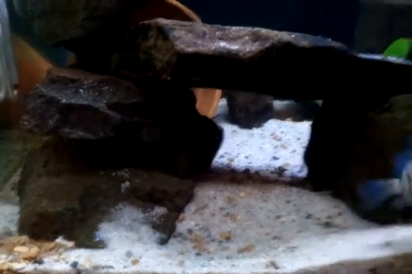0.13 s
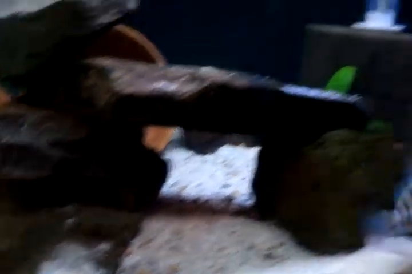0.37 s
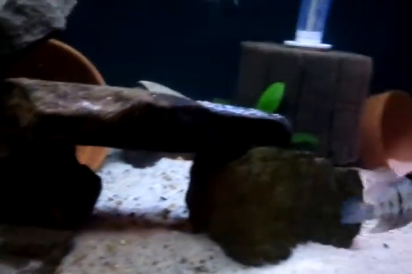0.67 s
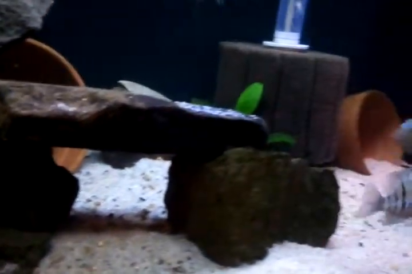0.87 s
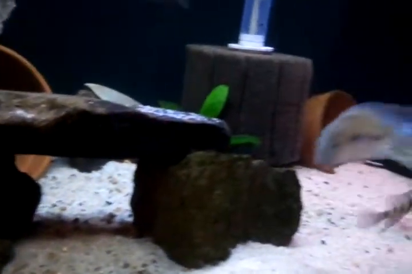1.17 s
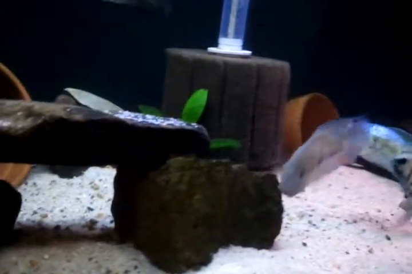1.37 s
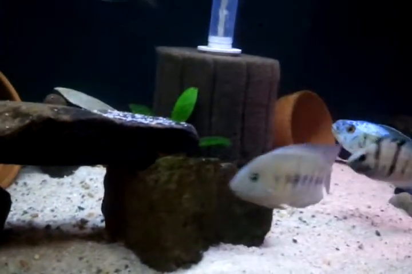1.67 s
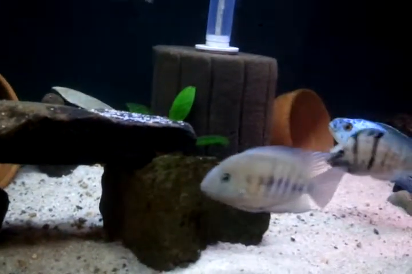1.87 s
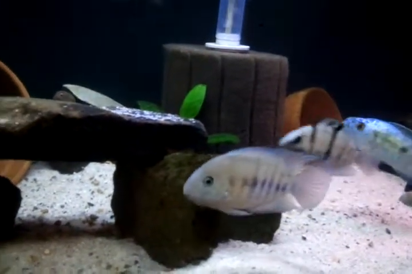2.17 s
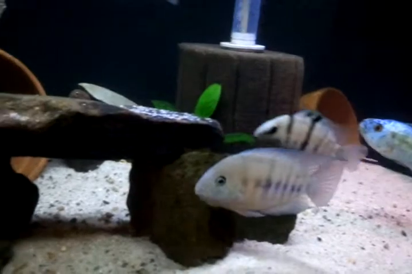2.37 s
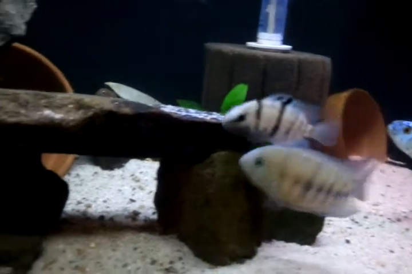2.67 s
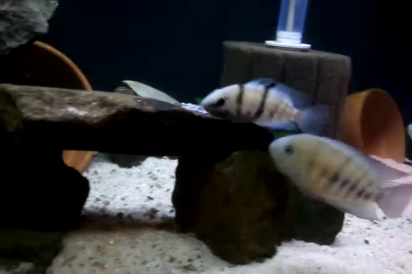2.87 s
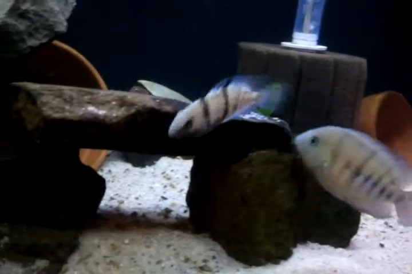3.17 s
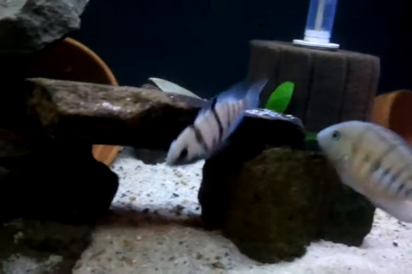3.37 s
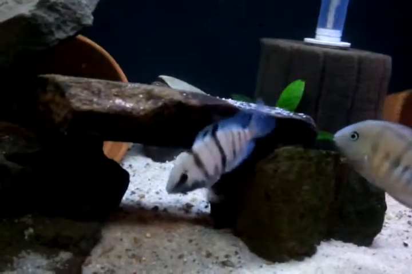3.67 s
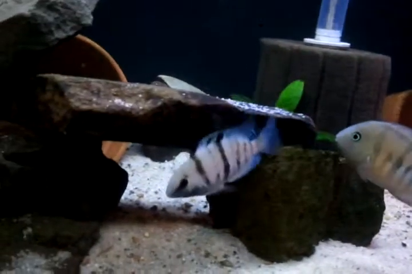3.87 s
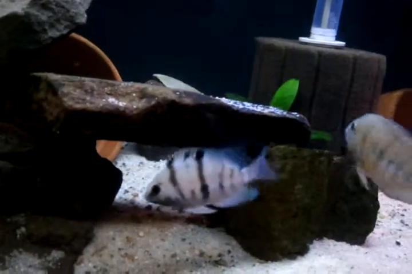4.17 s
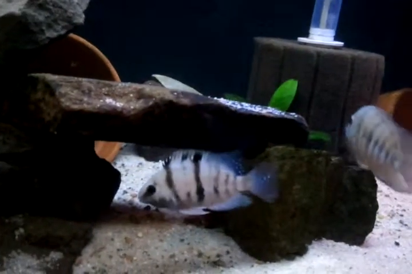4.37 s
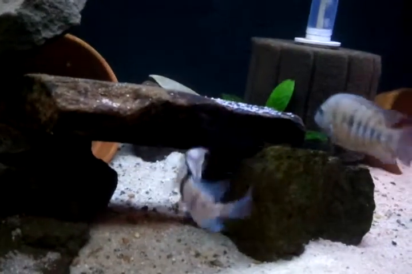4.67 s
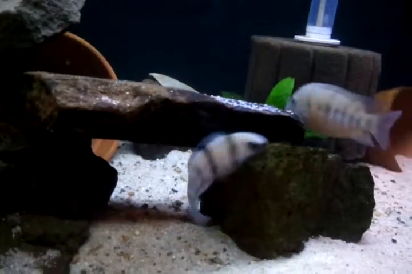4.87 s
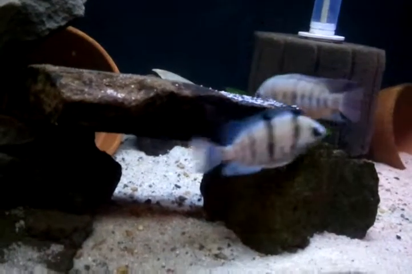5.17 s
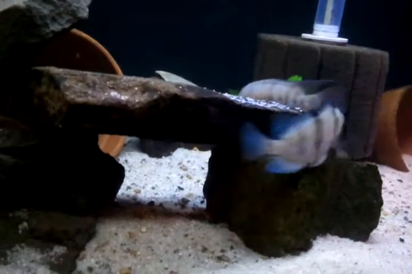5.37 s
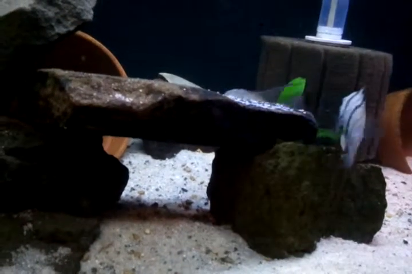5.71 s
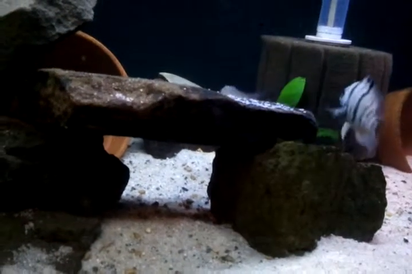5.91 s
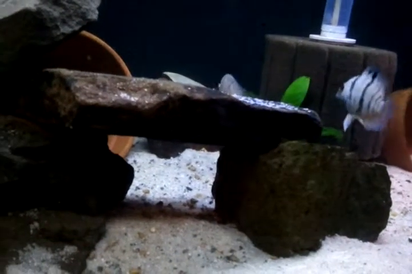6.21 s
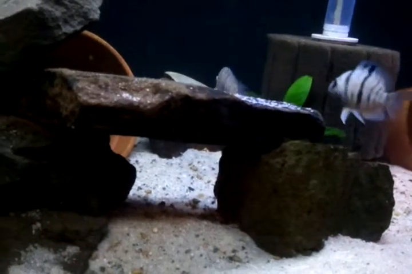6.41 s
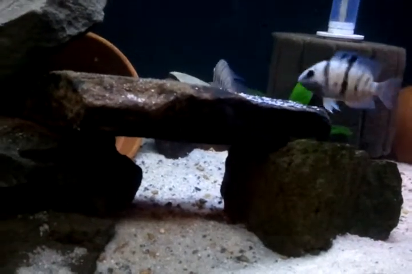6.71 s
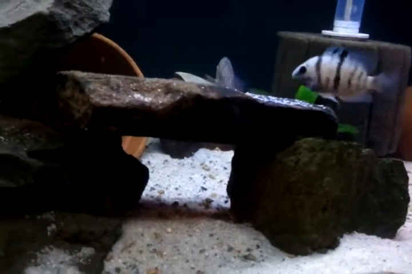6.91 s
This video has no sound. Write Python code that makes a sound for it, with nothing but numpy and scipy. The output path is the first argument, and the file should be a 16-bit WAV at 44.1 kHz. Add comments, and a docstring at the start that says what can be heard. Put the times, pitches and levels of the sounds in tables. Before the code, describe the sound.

An aquarium filter trickles and bubbles over a humming, whining pump, with dull bumps on the tank early on.

```python
"""A small room with an aquarium, heard in mono from one microphone within earshot of the tank.
The filter trickles into the water: a wash of tiny bubbles, with splashes and single plinks on top.
Behind it the mains-driven pump hums and whines. In the first second or so, dull bumps shake the tank
and its stand; a few faint ones follow. The microphone's input sits off centre, so its limiter ducks
on the downward swings of the bumps."""
import sys
import numpy as np
from scipy import signal
from scipy.fft import rfft, irfft, next_fast_len
from scipy.io import wavfile
from scipy.ndimage import uniform_filter1d, minimum_filter1d, map_coordinates

SR = 44100
rng = np.random.default_rng(int(sys.argv[2]) if len(sys.argv) > 2 else 0)


def master(y):
    """Save y as 16-bit WAV."""
    cut = np.clip(np.atleast_2d(y).T, -1, 1)
    pcm = np.round(cut * 32767)  # scale
    wavfile.write(sys.argv[1], SR, pcm.astype(np.int16))


N = 310905

# Low room tone. Each row: frequency in Hz, relative level in dB.
ROOM_SPECTRUM = [(15, -17.5), (28, -3.5), (70, -4), (110, -10), (150, -14.5), (220, -12), (300, -15.5),
                 (430, -21), (800, -19.5), (2000, -50)]
# Reverberation off the walls. Each row: frequency in Hz, seconds to fall 60 dB.
WALL_DECAY = [(200, 0.15), (1200, .18), (7000, .16)]
# How near the pump sounds. Each row: time in seconds, gain in dB.
PUMP_NEARNESS = [(0, -0.5), (2.7, 1.1), (4.2, 1), (4.9, 1), (6.1, -2), (7.05, 0)]
# The pump's hum. Each row: multiple of the mains frequency, level in dB.
PUMP_HARMONICS = [(1, -40.5), (2, -40), (3, -45), (4, -44.5), (5, -61.5), (6, -47.5), (9, -52), (10, -52),
                  (12, -60.5), (17, -63.5), (22, -52.5), (23, -39.5), (24, -48.5), (25, -55.5)]
# Resonances shaken by pump and flow. Each row: centre in Hz, half-width in Hz, level in dB.
PUMP_RESONANCES = [(28, 9.1, -37.5), (57, 23, -45.5), (89, 18, -48.5), (325.5, 17, -50.5), (566, 10, -51),
                   (1705, 5.7, -63)]
# Blows on the tank. Each row: start in seconds, level in dB, pitch in Hz, knock against body in dB.
BUMP_EVENTS = [(.32, -23, 154, -4.5), (.468, -5.5, 267, -17.5), (0.479, -7.5, 123, -18),
               (.512, -9.5, 175, -16.5), (.545, -15, 64.7, -22.5), (0.646, -12, 191, -25),
               (.664, -5.5, 201, -20.5), (.70, -8, 180, -26.5), (.729, -20, 253, -10.5),
               (0.931, -14.5, 65, -20), (1.085, -6, 33.3, -36), (1.105, -2, 138.7, -16.5),
               (1.131, -13.5, 233, -26.5), (1.149, -9, 107, -29.5), (1.907, -25.5, 251, 0),
               (2.08, -21, 178, -12.5), (2.221, -30.5, 220, -20)]
# Modes of tank and stand. Each row: frequency in Hz, relative level in dB, seconds to fall 60 dB.
TANK_MODES = [(32, 2, 0.43), (71.5, 2, 0.49), (102, 1, 0.29), (123.5, 2, .28), (154.7, -5, 0.45),
              (182.5, 0.5, 0.38), (207.4, 1, 0.22), (226.3, 1.5, 0.18), (257.5, -8, 0.41),
              (335, -18.5, 0.35), (405.3, 0.5, 0.42), (453, -14, 0.42), (698, 6, 0.34)]
# The hard part of a blow. Each row: frequency in Hz, relative level in dB.
KNOCK_SPECTRUM = [(200, -5), (410, 0.5), (500, -8.5), (800, -8), (1400, -13), (2500, -34.5), (6000, -49)]
# The ring after the middle bumps. Each row: centre in Hz, half-width in Hz, level in dB.
LINGER_RESONANCES = [(280, 19, -35.5), (437, 45, -41.5)]
# Splashes of the stream. Each row: start in seconds, bubble pitch in Hz, level in dB.
SPATTER_EVENTS = [(.198, 3400, -28.5), (0.899, 3500, -28), (1.733, 3130, -27), (1.892, 3830, -24),
                  (2.142, 3000, -26), (2.202, 4250, -27), (3.073, 5900, -30), (3.356, 3200, -26),
                  (3.63, 3870, -31), (3.857, 3480, -24.5), (4.102, 2950, -22), (4.195, 3550, -21.5),
                  (4.283, 3000, -29.5), (4.345, 3010, -27), (4.705, 3270, -28.5), (5.142, 3680, -28),
                  (6.82, 4740, -27.5), (6.929, 3330, -29.5)]
# Single big bubbles. Each row: start in seconds, pitch in Hz, level in dB.
PLINK_EVENTS = [(1.402, 1680, -27), (1.413, 1300, -27.5), (1.437, 1300, -23), (1.583, 2160, -23),
                (2.078, 775, -37), (2.205, 1106, -27.5), (2.218, 1110, -28.5), (2.659, 1276, -26),
                (2.683, 1275, -27.5), (2.731, 2140, -26), (2.88, 786, -32), (2.985, 1290, -28),
                (3.074, 2150, -30), (3.392, 1340, -28), (3.62, 857, -37), (3.762, 768, -34),
                (3.892, 1700, -29), (4.118, 1710, -27.5), (4.187, 1020, -33.5), (5.185, 1117, -31),
                (5.476, 1135, -31), (5.656, 1535, -31.5), (5.789, 1030, -29), (5.969, 1670, -32),
                (6.226, 1018, -34)]
# Tone of the trickle at the microphone. Each row: frequency in Hz, relative level in dB.
WATER_SPECTRUM = [(350, -8), (600, -9.5), (900, -7.5), (1200, -7), (1700, -2), (2100, -4.5), (2450, -3.5),
                  (3200, 1), (4200, 1.5), (5300, -3), (6500, -4.5), (7100, -19)]
# Strength of the filter's outflow. Each row: time in seconds, level in dB.
OUTFLOW = [(.03, -44.5), (.25, -42), (.95, -38), (1.15, -40), (1.5, -38), (2.4, -39.5), (3.0, -39.5),
           (3.5, -38.5), (4.5, -40), (5.0, -39.5), (5.6, -42), (6.3, -43.5), (6.7, -43), (6.92, -35.5),
           (7.05, -43.5)]

MAINS_HZ = 60.01
TIME = np.arange(N) / SR


def amp(db):
    """Decibels to gain."""
    return 10 ** (np.asarray(db) / 20)


def unit(x):
    """Scale to rms 1."""
    return x / np.sqrt(np.mean(x ** 2) + 1e-20)


def along(points, hz):
    """Read (Hz, value) points on a log frequency axis."""
    freqs, values = np.transpose(points)
    return np.interp(np.log(hz + 1), np.log(freqs + 1), values)


def curve(points):
    """Read (seconds, value) points at every sample."""
    return np.interp(TIME, *np.transpose(points))


def wobble(rate):
    """A smooth random curve, rate knots a second."""
    knots = rng.standard_normal(int(N * rate / SR) + 4)
    return map_coordinates(knots, [np.arange(N) * rate / SR])


def filtered(x, response):
    """Shape x with a gain that depends on frequency."""
    size = next_fast_len(len(x) + 8192)
    return irfft(rfft(x, size) * response(np.fft.rfftfreq(size, 1 / SR)), size)[:len(x)]


def noise(response):
    """Coloured noise of rms 1."""
    return unit(filtered(rng.standard_normal(N), response))


def burst(t, response, t60):
    """Coloured noise that falls 60 dB in t60 seconds."""
    return filtered(rng.standard_normal(len(t)), response) * amp(-60 * t / t60)


def add(track, start, sound):
    """Mix a sound into the track, start seconds in."""
    part = track[max(round(start * SR), 0):][:len(sound)]
    part += sound[:len(part)]


def resonances(table):
    """Narrow resonances shaken at random."""
    return sum(amp(db) * noise(lambda hz: 1 / (1 + ((hz - centre) / width) ** 2))
               for centre, width, db in table)


def room(x, wet_db):
    """Direct sound plus the walls' answer; the tail changes as bubbles burst at different spots."""
    out, block = x.copy(), SR // 3
    for start in range(0, N, block):
        hz, t, spectrum = signal.stft(rng.standard_normal(block), SR, nperseg=256)
        decay = amp(-60 * t / along(WALL_DECAY, hz)[:, None])
        tail = signal.istft(spectrum * decay, SR, nperseg=256)[1]
        reverb = signal.fftconvolve(x[start:start + block], tail / np.linalg.norm(tail))
        add(out, start / SR, amp(wet_db) * reverb)
    return out


def room_tone(sag_db_per_s=0.55):
    """The room's low rumble eases slowly and grows a little near the pump."""
    level_db = -35 - sag_db_per_s * TIME + 0.62 * curve(PUMP_NEARNESS) + 0.52 * wobble(4.4)
    return amp(level_db) * noise(lambda hz: amp(along(ROOM_SPECTRUM, hz)))


def pump():
    """Mains harmonics, slightly unsteady under load; the housing favours a few of them as a whine."""
    mains_phase = 2 * np.pi * MAINS_HZ * TIME
    hum = np.zeros(N)
    for k, db in PUMP_HARMONICS:
        lag = np.pi * k ** 2 / 2 + 5 / k  # the housing disperses the harmonics, smoothing the whine
        hum += amp(db + 0.95 * wobble(2.86)) * np.sin(k * mains_phase - lag + 0.034 * wobble(9.7))
    return amp(curve(PUMP_NEARNESS)) * (hum + resonances(PUMP_RESONANCES))


def lingering_ring(start=0.57, rise_s=0.03, hold_s=0.48, sag_db_per_s=10.5, damped_t60=0.12):
    """A faint ring swells after the middle bumps, sags slowly and is then damped."""
    age = np.maximum(TIME - start, 0)
    fade_db = sag_db_per_s * age + 60 * np.maximum(age - hold_s, 0) / damped_t60
    return (1 - np.exp(-age / rise_s)) * amp(4 - fade_db) * resonances(LINGER_RESONANCES)


def bumps(thud_db=-6, rise_cycles=0.62, knock_rise_s=0.002):
    """Soft blows ring tank and stand around each blow's pitch, with a diffuse thud and a harder knock."""
    out, t = np.zeros(N), np.arange(SR // 2) / SR
    for start, db, pitch_hz, knock_db in BUMP_EVENTS:
        contact = lambda hz: 1 / (1 + (2.03 * np.log((hz + 1) / pitch_hz)) ** 2) ** 2
        ring = np.zeros(len(t))
        for hz, mode_db, t60 in TANK_MODES:
            envelope = contact(hz) * amp(mode_db + rng.standard_normal() - 60 * t / t60)
            ring += envelope * np.sin(2 * np.pi * hz * t + rng.uniform(0, 2 * np.pi))
        thud = burst(t, contact, t60=0.33)
        knock = burst(t, lambda hz: amp(along(KNOCK_SPECTRUM, hz)), t60=0.17)
        knock = amp(knock_db) * unit(knock) * (1 - np.exp(-t / knock_rise_s))
        body = (unit(ring) + amp(thud_db) * unit(thud)) * (1 - np.exp(-t * pitch_hz / rise_cycles))
        add(out, start, amp(db - 16) * unit(body + knock))
    return out


def drop_snap(start=3.576, centre_hz=4700, width_hz=450, peak_db=-20.5):
    """One drop smacks the surface with a short, bright crack."""
    out, t = np.zeros(N), np.arange(SR // 16) / SR
    crack = burst(t, lambda hz: 1 / (1 + ((hz - centre_hz) / width_hz) ** 2), t60=0.025)
    add(out, start, amp(peak_db) * crack / np.abs(crack).max())
    return room(out, wet_db=-14)


def bubbles(starts, hz, strength, cycles, rise, onset_s):
    """Each bubble starts softly, rings for some cycles (to -60 dB) and climbs as it nears the surface."""
    t = np.arange(SR // 16) / SR
    age = t * hz[:, None] / cycles
    climb = 1 + rise * np.minimum(age, 1) / 2
    ring = np.sin(2 * np.pi * hz[:, None] * t * climb) * amp(-60 * age)
    ring *= 1 - np.exp(-(t / onset_s) ** 2)
    samples = (starts[:, None] * SR).astype(int) + np.arange(len(t))
    return np.bincount(samples.ravel(), (strength[:, None] * ring).ravel(), N)[:N]


def spatters(count=20, length_s=0.045, pitch_spread=0.07):
    """Each splash of the stream sheds a quick cluster of like-sized bubbles."""
    out = np.zeros(N)
    for start, hz, db in SPATTER_EVENTS:
        starts = start + length_s * rng.beta(2, 2, count)
        pitches = hz * np.exp(pitch_spread * rng.standard_normal(count))
        cluster = bubbles(starts, pitches, np.ones(count), cycles=35, rise=0.032, onset_s=0.00057)
        out += amp(db - 3) * cluster / np.abs(cluster).max()
    return room(out, wet_db=-1.5)


def plinks():
    """Single big bubbles ring out above the wash; the higher ones die sooner."""
    starts, hz, db = np.transpose(PLINK_EVENTS)
    return room(bubbles(starts, hz, amp(db + 2), cycles=75, rise=0.064, onset_s=0.0017), wet_db=2)


def swarm(low_hz, high_hz, unevenness, cycles, count):
    """A crowd of bubbles at random times and pitches, many weak and a few strong."""
    when, pitch, rank = rng.random((count, 3)).T
    hz = low_hz * (high_hz / low_hz) ** pitch
    strength = amp(-unevenness * np.log(rank + 0.21))
    return unit(bubbles(when * N / SR, hz, strength, cycles, rise=0.15, onset_s=0.0029))


def trickle(crossover_hz=2500, low_cut_hz=300):
    """One outflow drives a gurgle of larger bubbles and a splash of small ones, each over a wash."""
    colour = lambda hz: amp(along(WATER_SPECTRUM, hz)) / np.sqrt(1 + (low_cut_hz / (hz + 1)) ** 4)
    treble_share = lambda hz: 1 / (1 + (crossover_hz / (hz + 1)) ** 8)
    large = room(swarm(949, 2600, unevenness=5, cycles=55, count=1400), wet_db=2)
    small = room(swarm(2753, 7000, unevenness=6.5, cycles=60, count=2600), wet_db=7.5)
    low_wash = noise(lambda hz: colour(hz) * np.sqrt(1 - treble_share(hz)))
    high_wash = amp(-3 + wobble(22)) * noise(lambda hz: colour(hz) * np.sqrt(treble_share(hz)))
    gurgle = unit(filtered(large, colour)) + low_wash
    splash = amp(-4) * unit(filtered(small, colour)) + high_wash
    flow_db = curve(OUTFLOW)
    swing_db = flow_db - flow_db.mean()
    gurgle_db = -3.5 + 0.6 * swing_db + 0.6 * wobble(12)
    splash_db = -1.5 + 0.73 * swing_db + 0.54 * wobble(9.4)
    splutter_db = 0.5 * wobble(23.77)  # the stream splutters as a whole
    return amp(flow_db.mean() + splutter_db) * (amp(gurgle_db) * gurgle + amp(splash_db) * splash)


def scene():
    """What reaches the microphone: water, pump and bumps over the room tone."""
    background = room_tone()
    water = trickle() + plinks() + spatters() + drop_snap()
    return (background + water + pump() + bumps() + lingering_ring())[None]


def record(dry, offset=-0.32, ceiling=0.62, hold_s=0.0096, top_hz=7200):
    """The microphone feeds an off-centre input, a fast limiter and a steep treble cut."""
    x = dry[0] + offset  # downward swings reach the ceiling first
    span = int(hold_s * SR)
    needed_gain = np.minimum(1, ceiling / (np.abs(x) + 1e-9))
    gain = uniform_filter1d(minimum_filter1d(needed_gain, span), span)
    treble_cut = lambda hz: 1 / np.sqrt(1 + (hz / top_hz) ** 160)
    return (filtered(x * gain - offset, treble_cut) + offset)[None]


dry = scene()
out = record(dry)
master(out)
```